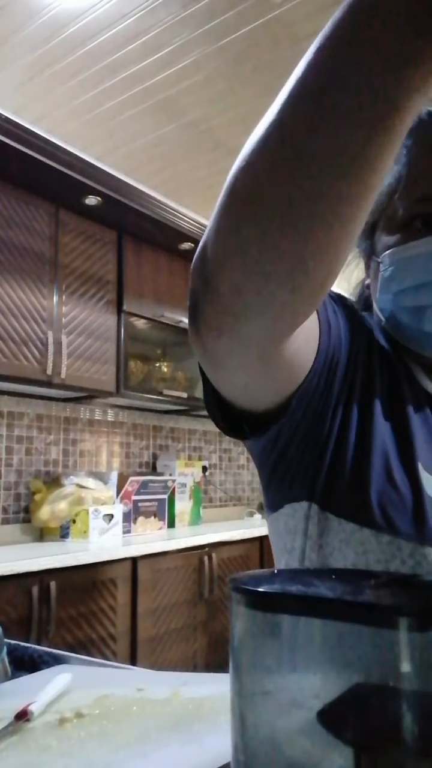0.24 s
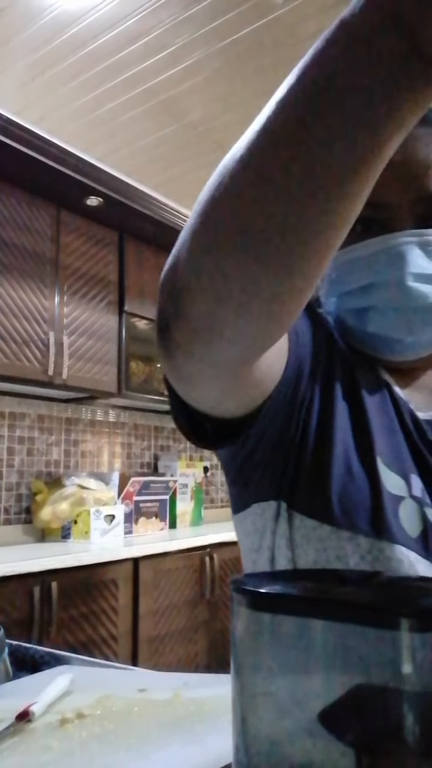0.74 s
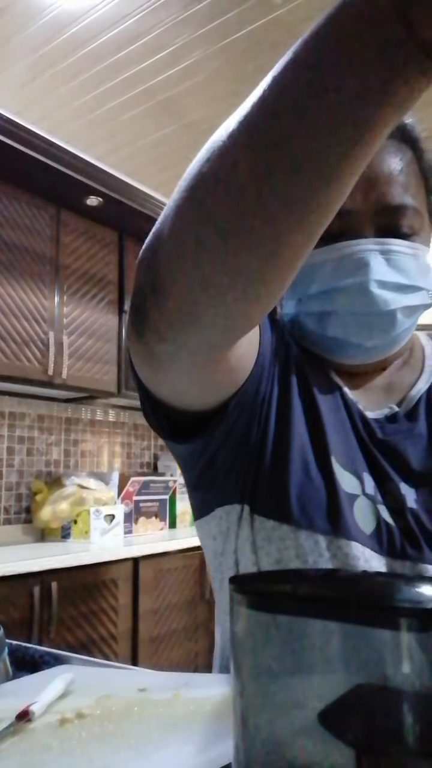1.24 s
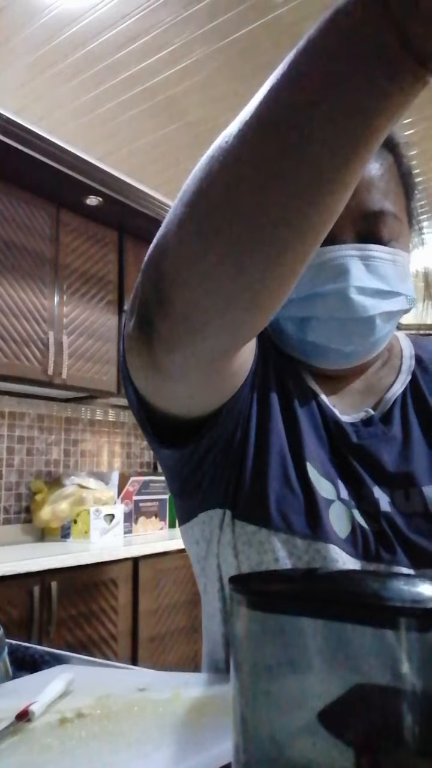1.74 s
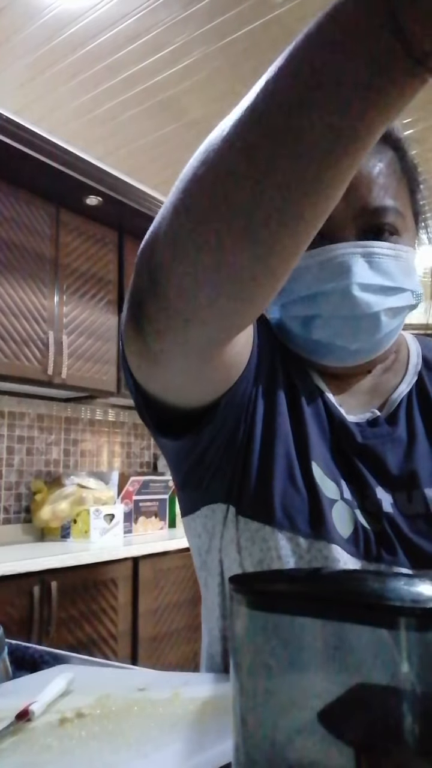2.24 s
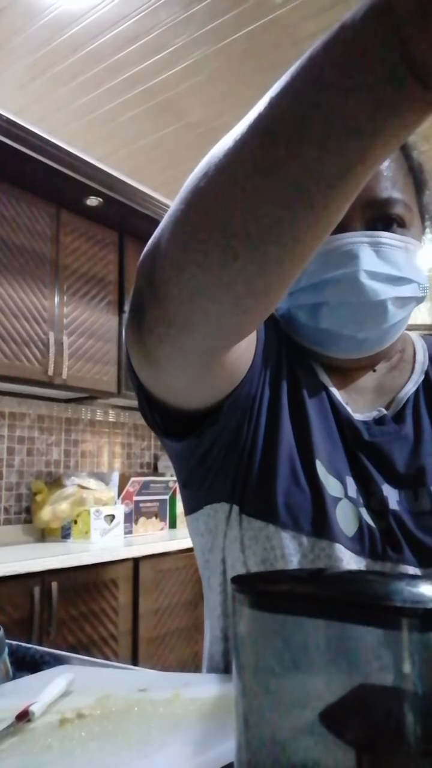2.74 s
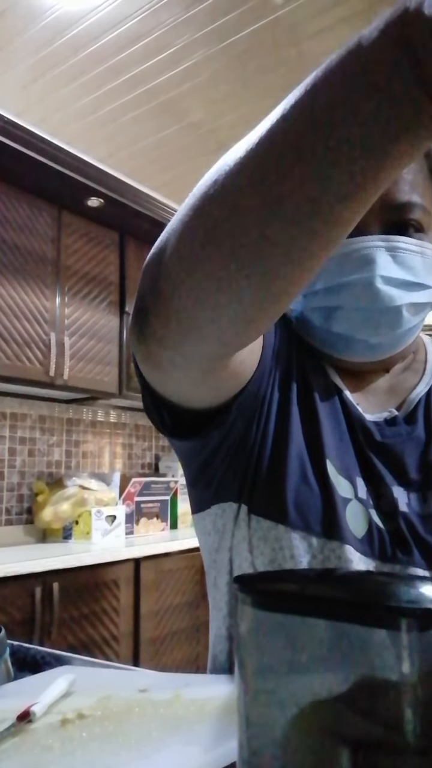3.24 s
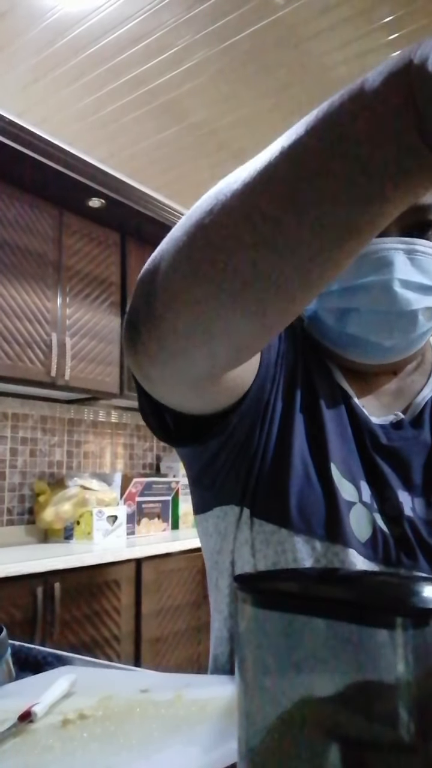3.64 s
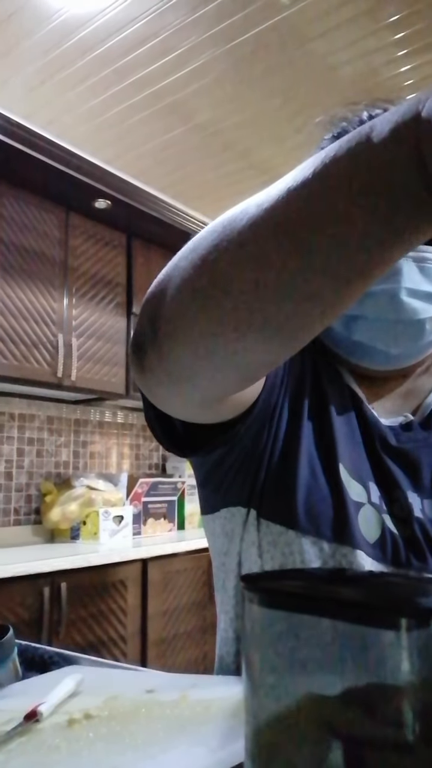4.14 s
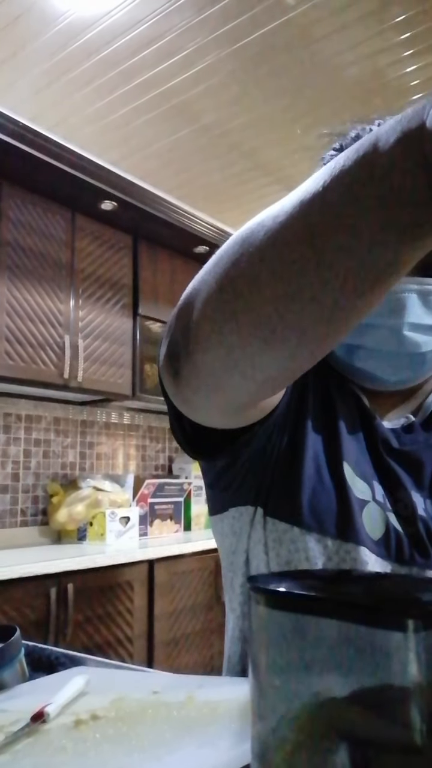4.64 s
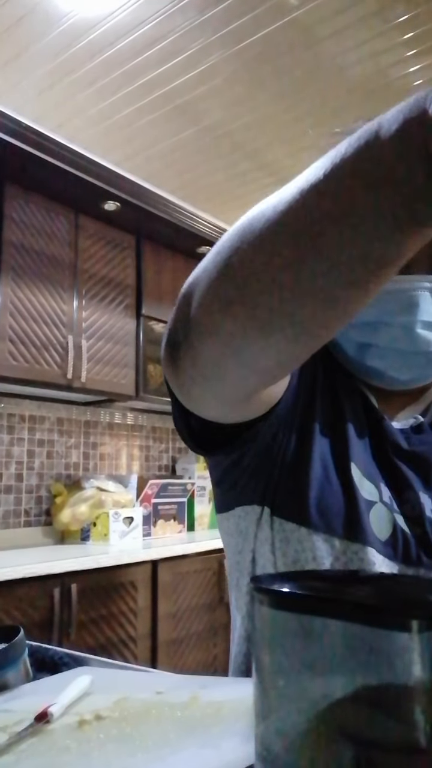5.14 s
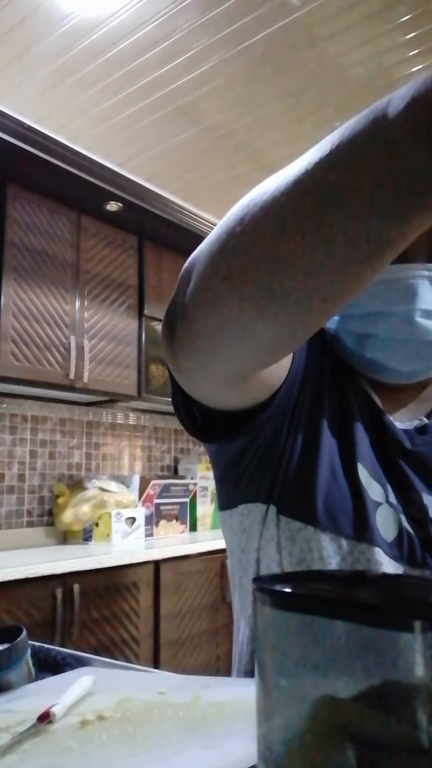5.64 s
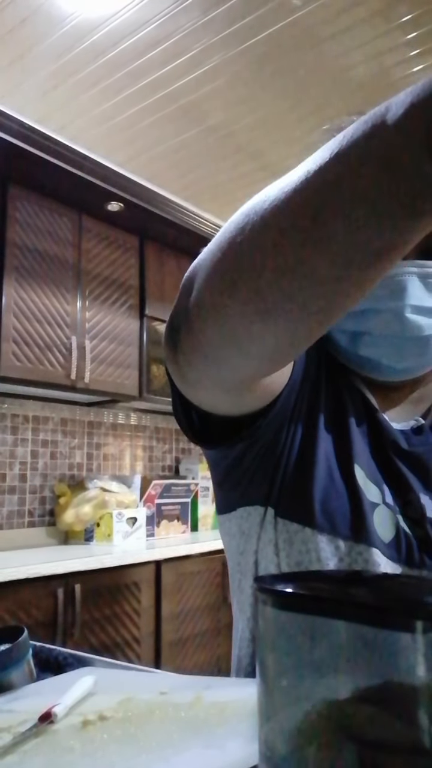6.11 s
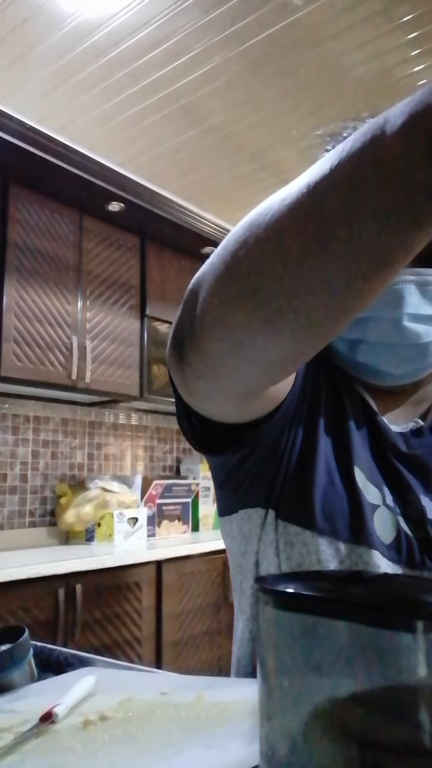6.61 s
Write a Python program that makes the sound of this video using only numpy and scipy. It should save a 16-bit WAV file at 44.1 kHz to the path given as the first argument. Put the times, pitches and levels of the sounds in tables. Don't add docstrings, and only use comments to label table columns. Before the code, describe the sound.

Plastic clicks and a hollow knock in a humming kitchen, then a juicer grinds fruit roughly, breaks free and whines steadily upward.

```python
import sys
import numpy as np
from scipy import signal
from scipy.fft import rfft, irfft, next_fast_len
from scipy.io import wavfile

SR = 44100
rng = np.random.default_rng(int(sys.argv[2]) if len(sys.argv) > 2 else 0)


def elevation(decibels):
    levels = np.asarray(decibels, float)
    return 10 ** (levels / 20)


def inscribe(sig):
    pcm = np.round(np.clip(np.atleast_2d(sig).T, -1, 1) * 32767)
    wavfile.write(sys.argv[1], SR, pcm.astype(np.int16))


N = 302967
TIME = np.arange(N) / SR
MAINS_PULSE_HZ = 120

# (frequency [Hz], level [dB])
ROOM_SPECTRUM = [(15, -63), (25, -20), (114, -10.5), (170, -5), (223, -21), (293, -9.5), (695, -13),
                 (775, -13.5), (1290, -20.5), (1940, -22), (4250, -33), (6740, -26), (8590, -39),
                 (14800, -50), (16000, -33)]
# (frequency [Hz], likeness [-1..1])
ROOM_ALIKE = [(60, 0.83), (130, 0.94), (290, 1), (640, 0.44), (1410, -0.54), (3100, 0.29), (6820, -0.22),
              (15000, 0.052)]
# (frequency [Hz], left over right [dB])
ROOM_SIDE = [(60, -7), (110, -2), (200, -2.0), (380, -2.5), (700, -4.5), (1290, -2), (2380, -9),
             (4400, -8.5), (8120, -5.5), (15000, -14)]
# (frequency [Hz], wander [Hz], level over room [dB])
HUM_LINES = [(122.7, 8.74, -10), (226.2, 0.58, -3), (404, 9.1, -18.5), (592, 7.4, -23), (766, 1.75, -14.5)]
# (time [s], depth [dB], recovery [dB/s])
GAIN_DIPS = [
    (1.95, -4, 10.5),
    (2.363, -28, 1500),
]
ROOM_DB, RUNNING_ROOM_DB, SWITCH_S, HUM_LOST_DB = -41, -49.5, 2.372, -3

# (time [s], peak [dB], resonance [Hz], t60 [s], pan [dB])
CLICKS = [(.1815, -36, 9000, 0.013, -15), (.3097, -25, 4600, 0.019, -15), (.3716, -32.5, 5760, 0.021, -18),
          (.9662, -34.5, 7840, 0.037, -11), (1.9131, -33.5, 12000, 0.058, -18),
          (1.927, -26, 9100, .04, -13), (1.9305, -34, 9450, 0.053, -21), (1.94, -16.5, 6550, 0.046, -20.5),
          (2.199, -48, 12070, 0.018, -5), (2.356, -31, 7000, 0.02, -6), (2.375, -23, 6500, 0.047, -13)]
# (frequency [Hz], level [dB])
SNAP_SPECTRUM = [(710, -66), (1200, -57), (1430, -16), (2980, 0.5), (3700, -22), (6370, 4), (8820, -4.5),
                 (14800, -7), (16000, 2.5)]
# (time [s], hold [s], force [dB])
KNOCKS = [
    (.3105, .001, -16),
    (.314, .012, -24),
    (.335, .012, -32),
    (.349, .037, -30.5),
]
# (frequency [Hz], level [dB], t60 [s])
TUB_MODES = [(70, -15.5, 0.047), (197, -7, 0.08), (340, -18, 0.059), (493, -3.5, 0.054), (604, -7, 0.084),
             (923, -7, 0.017), (1012, -11, 0.021), (1430, -31, 0.037), (2400, -39, 0.069)]
LAND_DB_PER_S, LIFT_DB_PER_S = 9000, 2000

# (frequency [Hz], likeness [-1..1])
JUICER_ALIKE = [(60, 0.89), (300, 0.84), (700, 0.57), (2000, 0.046), (6000, 0.035), (15000, 0.03)]
LAG_SAMPLES = 22
IN_STEP_HZ = 462
# (time [s], hold [s], housing thump [dB], pulp rumble [dB], tearing hiss [dB])
PUSHES = [(2.428, 0.022, -38.5, -41.5, -53), (2.498, .13, -35, -25.5, -38.5),
          (2.678, 0.13, -29, -26, -30.5), (2.971, 0.13, -32, -32, -29.5), (3.157, 0.027, -29, -28.5, -29.5),
          (3.342, 0.15, -41.5, -37, -31.5), (3.481, 0.11, -35, -32, -30), (3.64, 0.14, -38.5, -35.5, -32),
          (3.833, 0.065, -33, -28.5, -30), (3.939, 0.021, -23, -28.5, -32.5),
          (4.058, 0.0052, -29, -29.5, -35.5)]
# (thump [dB], rumble [dB], hiss [dB])
BETWEEN_DB = (-44.5, -39, -33)
GRATING_START_S, GRATING_END_S = 2.56, 3.4
# (thump [dB/s], rumble [dB/s], hiss [dB/s])
PRESS_DB_PER_S = (322, 250, 201)
EASE_DB_PER_S = (279, 200, 134)
# (frequency [Hz], level [dB])
THUMP_SPECTRUM = [(15, -47), (25, -37), (70, 5), (140, -2.5), (173, -0.5), (249, -13.5), (300, -7),
                  (390, -14), (660, -120)]
# (frequency [Hz], level [dB])
STALLED_SPECTRUM = [(130, -37), (220, -8.5), (252, -25), (345, 0.5), (415, -3.5), (483, -8.5), (645, -6),
                    (783, -17.5), (941, -9), (1500, -23.5), (1950, -45), (3300, -120)]
# (frequency [Hz], level [dB])
RUMBLE_SPECTRUM = [(130, -40), (220, -5), (248, -19), (405, -0.5), (483, -11), (545, -4), (770, -10.5),
                   (912, -3.5), (1110, -12.5), (1500, -52), (1950, -51), (3300, -120)]
# (frequency [Hz], level [dB])
TEAR_SPECTRUM = [(710, -15), (1200, -3.5), (1280, -7), (1950, -2), (3050, -3), (3830, -8.5), (4800, -6.5),
                 (5240, 0.5), (5900, -4.5), (7100, 3), (7910, -8), (9210, -14), (13900, -16.5),
                 (15000, -14), (16000, -35)]
# (frequency [Hz], left over right [dB])
GRIND_SIDE = [(60, 0), (110, 5), (200, -2), (380, 1.5), (700, 2.5), (1290, 8.5), (2380, 0.5), (4400, 2.5),
              (8120, 3), (15000, -6.5)]
# (time [s], length [s], starting shaft speed [Hz], whine [dB])
SLIPS = [(2.923, 0.054, 71.1, -40), (3.077, 0.068, 76.6, -38.5), (3.244, 0.073, 75.6, -38),
         (3.338, 0.042, 73.96, -37.5), (3.446, 0.062, 79.6, -40), (3.601, 0.124, 71.94, -33.5),
         (3.771, 0.046, 79.9, -37), (3.843, .04, 77.9, -39.5)]
GAIN_HZ_PER_S, CATCH_DB_PER_S, LABOUR_DB = 38, 550, -50
# (time [s], peak [dB], resonance [Hz], pan [dB])
CRACKS = [(2.443, -34, 7180, -1), (2.5254, -21.5, 3040, 0), (2.574, -24, 2060, 0),
          (2.6017, -18.5, 3120, -5), (2.687, -24, 5200, 0), (2.72, -19.5, 5730, 6), (2.787, -23.5, 7080, 4),
          (2.847, -23, 7000, 5), (2.863, -19, 7250, 4), (3.1024, -22, 7260, 7), (3.15, -20, 7200, 9),
          (3.195, -21, 7350, -7), (3.232, -33, 2400, -3), (3.253, -37, 7110, -16), (3.5229, -19.5, 7340, 8),
          (3.548, -26, 2200, 0), (3.7857, -22, 3006, 13), (3.9008, -24, 7160, 1), (3.9328, -18, 6860, -5),
          (3.936, -20, 1800, -2), (4.0578, -25, 7120, 0), (4.075, -18.5, 5630, -9), (4.1515, -28, 2480, -8)]
FIBRE_T60_S = 0.048

FREE_S, TOP_HZ, QUICK_HZ, QUICK_S, SLOW_HZ, SLOW_S = 4.08, 220.94, 51.76, .3225, 89.3, .913
# (frequency [Hz], level [dB])
WHOOSH_SPECTRUM = [(24, -65), (40, -39), (65, -88), (107, -3), (155, -14.5), (208, -5), (265, -9.5),
                   (410, -0.5), (644, -12), (709, -39), (1170, -20.5), (1290, -46), (1900, -45),
                   (2470, -56), (4180, -120)]
# (frequency [Hz], level [dB])
HISS_SPECTRUM = [(880, -35), (1500, -7), (1870, -10.5), (2410, -4.5), (3000, -8.5), (3660, -11.5),
                 (3960, -7.5), (4290, -10.5), (4780, -6), (6430, 4), (7610, -0.5), (8660, -14.5),
                 (9750, -9), (10800, -13), (14900, -14), (16000, -22)]
# (frequency [Hz], level [dB])
CHUTE_SPECTRUM = [(700, -50), (850, 0.5), (1000, 7.5), (1200, 9), (1300, -51)]
# (frequency [Hz], left over right [dB])
AIR_SIDE = [(60, 15), (110, -5), (200, 5), (380, -7.5), (700, 0.5), (1290, 5), (2380, -10.5), (4400, 1.5),
            (8120, -2), (15000, -16.5)]
# (whoosh [dB], hiss [dB], chute [dB])
AIR_DB = (-44, -46.5, -56.5)
AIR_POWER = (2.8, 1.13, -0.43)
# (basket [dB], chute [dB])
CLEARING_S = (4.08, 4.15)
CLEARING_DB = (-39, -46)
CLEARING_DB_PER_S = 180
COUNTER_HZ, COUNTER_WIDTH_HZ, SHUDDER_DB = 197.3, 5.1, -55

WOBBLE_DB, FEET_HZ, FEET_WIDTH_HZ, FEET_DB, WOBBLE_RISE_S = -41.5, 118, 8, 7.5, .1
# (frequency [Hz], left [dB], right [dB])
WHINE_PATH = [(1050, -45, -49), (1275, -45, -47), (1425, -59, -47), (1540, -59, -48), (1650, -49, -40),
              (1725, -48, -42), (1800, -53, -48), (1875, -43, -40), (1950, -42, -40), (2040, -33, -39),
              (2075, -34, -38), (2110, -40, -43), (2150, -41, -46), (2210, -43, -39), (2245, -54, -38),
              (2315, -46, -32), (2350, -47, -32), (2420, -40, -30), (2455, -43, -32), (2525, -43, -33),
              (2560, -54, -32), (2610, -49, -33), (2640, -42, -34), (2700, -38, -39), (2780, -38, -42)]
# (shaft order, mains sideband, level re whine [dB])
WHINE_PARTNERS = [(12, 0, 0), (12, -1, -7), (12, 1, -6), (12, -2, -33), (12, 2, -22)]
SIDEBAND_TURN_RAD = .9
# (shaft order, mains sideband, left [dB], right [dB],
# loss below top speed [dB per shaft Hz], left lead [rad])
SLOTS = [(9, 0, -62, -63, .8, 0), (9, 1, -56, -58, 1.0, 0), (10, -1, -54, -56, 1.0, 0),
         (10, 0, -49, -51, .3, 1.9), (10, 1, -63, -56, .3, 0), (11, -1, -61, -57, .2, 0),
         (11, 0, -59, -45, .3, .3), (11, 1, -53, -46, .15, -1.8), (13, -1, -50, -48.5, .1, -2.6),
         (13, 0, -56, -54, -.2, 2.4), (13, 1, -56, -58, .3, 0), (14, -1, -60, -61, .2, 0),
         (14, 0, -51, -52, .6, 0), (15, 0, -63, -60, .3, 0)]
# (shaft order, level [dB], left lag [samples], loss below 150 Hz [dB per shaft Hz])
OVERTONES = [(24, -1, 23, 0), (36, -3.5, 20, .4), (48, -11, 22, 0), (60, -15.5, 22, 0), (72, -17, 22, 0),
             (84, -19, 22, 0)]
# (frequency [Hz], width [Hz], left [dB], right [dB])
SHELL_MODES = [(2500, 330, -52, -36), (2990, 160, -31, -40), (3660, 200, -51, -51), (4050, 200, -49, -54),
               (4700, 300, -52, -50), (5150, 230, -35, -44), (5400, 120, -43, -46), (6296, 150, -33, -25),
               (6754, 200, -32, -26), (7050, 280, -31, -42), (7740, 250, -47, -53), (8250, 300, -40, -35),
               (9000, 400, -43, -44), (9900, 700, -42, -40), (11800, 500, -47, -29), (12800, 700, -48, -37),
               (13600, 400, -46, -32), (14900, 400, -54, -30)]
# (shaft order, left [dB], right [dB])
FAINT_ORDERS = [(2, -50, -48), (3, -49, -49), (5, -29, -34)]
# (time [s], peak [dB], resonance [Hz], t60 [s], pan [dB])
FLUNG_SCRAPS = [(4.245, -30, 4200, .02, 0), (4.7664, -28, 3200, .016, -4), (4.7668, -24, 5200, .016, 0),
                (4.8484, -17, 7000, .014, 0), (4.8488, -23, 4900, .014, 0), (4.9686, -28, 6630, .014, -3)]


def rms_one(x):
    return x / np.sqrt(np.mean(x ** 2) + 1e-20)


def at_hz(points, hz, axis=1):
    points = np.array(points)
    return np.interp(np.log(hz), np.log(points[:, 0]), points[:, axis])


def drift(rate, part=slice(None)):
    r = np.exp(-80 * np.pi * rate / SR)
    noise = rng.standard_normal(N // 40 + 2002)
    slow = rms_one(signal.lfilter([1], [1, -2 * r, r * r], noise)[2000:])
    return np.interp(TIME[part] * (SR / 40), np.arange(len(slow)), slow)


def pressing(rows, rise_db_per_s, fall_db_per_s):
    levels_db = []
    for s, hold_s, db in rows:
        rise_db = rise_db_per_s * np.maximum(s - TIME, 0)
        fall_db = fall_db_per_s * np.maximum(TIME - s - hold_s, 0)
        levels_db.append(db - rise_db - fall_db)
    return np.max(levels_db, axis=0)


def coloured(pair, span, spectrum, alike, side_db, patchy_db, lag=0):
    part = slice(round(span[0] * SR), min(round(span[1] * SR), N))
    length = part.stop - part.start
    size = next_fast_len(length)
    hz = np.maximum(np.arange(size // 2 + 1) * SR / size, 1)
    mid, side = rfft(pair[:, part], size) * elevation(at_hz(spectrum, hz))
    likeness = np.clip(at_hz(alike, hz), -1, 1)
    mid, side = np.sqrt(1 + likeness) * mid, np.sqrt(1 - likeness) * side
    tilt = elevation(at_hz(side_db, hz) / 2)
    late = np.exp(-2j * np.pi * np.maximum(hz - IN_STEP_HZ, 0) * lag / SR)
    both = np.array([(mid + side) * tilt * late, (mid - side) / tilt])
    out, half_octave = np.zeros((2, N)), 2 * np.log2(hz)
    first, last = int(2 * np.log2(spectrum[0][0])), int(2 * np.log2(spectrum[-1][0])) + 1
    for k in range(first, last + 1):
        band = irfft(both * np.clip(1 - abs(half_octave - k), 0, 1), size)[:, :length]
        out[:, part] += band * elevation(patchy_db * drift(9.2, part))
    return out / np.sqrt(np.mean(out[:, part].mean(axis=0) ** 2))


def juicer_noise(pair, span, spectrum, side_db, patchy_db):
    return coloured(pair, span, spectrum, JUICER_ALIKE, side_db, patchy_db, LAG_SAMPLES)


def ring(x, hz, t60):
    r, w = elevation(-60 / (t60 * SR)), 2 * np.pi * hz / SR
    return signal.lfilter([0, np.sin(w)], [1, -2 * r * np.cos(w), r * r], x + 1e-18)


def tone(phase, left_db, right_db, lag=LAG_SAMPLES, lead=0):
    left = np.roll(np.sin(phase + lead), lag) * elevation(left_db)
    return np.sqrt(2) * np.array([left, np.sin(phase) * elevation(right_db)])


def snaps(rows, body, ring_db):
    size = 4096
    out, age = np.zeros((2, N)), np.arange(size) / SR
    colour = elevation(at_hz(body, np.maximum(np.arange(size // 2 + 1) * SR / size, 1)))
    for s, peak_db, hz, t60, pan_db in rows:
        burst = rng.standard_normal((2, size))
        burst = irfft(rfft(burst + burst[0]) * colour)
        burst = rms_one(burst) + elevation(ring_db) * rms_one(ring(burst, hz, 0.0035))
        attack = 1 + 1.4 * np.exp(-age / 0.0016)
        level_db = peak_db - 16 - 60 * age / t60 + np.array([[pan_db / 2], [-pan_db / 2]])
        start = round(s * SR)
        out[:, start:start + size] += burst * attack * elevation(level_db)
    return out


def kitchen():
    noise = rng.standard_normal((2, N))
    room = elevation(-6.0) * coloured(noise, (0, 7), ROOM_SPECTRUM, ROOM_ALIKE, ROOM_SIDE, patchy_db=1.4)
    for hz, wander_hz, line_db in HUM_LINES:
        phase = 2 * np.pi * np.cumsum(hz + wander_hz * drift(18.6)) / SR
        line_db = line_db + HUM_LOST_DB * (TIME > SWITCH_S) + 2.67 * drift(9.8)
        side_db = at_hz(ROOM_SIDE, hz) / 2
        room += tone(phase, line_db + side_db, line_db - side_db, lag=0)
    sunk = 1 - np.exp(-np.maximum(TIME - SWITCH_S, 0) / 0.035)
    level_db = ROOM_DB + (RUNNING_ROOM_DB - ROOM_DB) * sunk
    for s, depth_db, recover_db_per_s in GAIN_DIPS:
        level_db += np.minimum(depth_db + recover_db_per_s * (TIME - s), 0) * (TIME > s)
    return room * elevation(level_db)


def clicks():
    return elevation(1.5) * snaps(CLICKS, SNAP_SPECTRUM, ring_db=-5)


def knocks():
    force = rng.standard_normal(N) * elevation(pressing(KNOCKS, LAND_DB_PER_S, LIFT_DB_PER_S) - 19.0)
    out = np.zeros(N)
    for k, (hz, level_db, t60) in enumerate(TUB_MODES):
        out += (-1) ** k * elevation(level_db) * ring(force, hz, t60)
    touch = np.zeros(N)
    touch[round((KNOCKS[0][0] - .001) * SR)] = elevation(-18.5)
    out += ring(touch, 1026, 0.044) - ring(touch, 920, 0.039) + elevation(-11.5) * ring(touch, 1500, 0.033)
    touch = np.roll(touch, round(.0625 * SR))
    out += elevation(-26) * ring(touch, 1510, .04) + elevation(-14) * ring(touch, 960, .04)
    return out * elevation(np.array([[-1.5], [1.5]]))


def grains(per_s, spread_db):
    sizes = elevation(spread_db * np.minimum(rng.exponential(1, (2, N)), 4)) * rng.choice([-1, 1], (2, N))
    return rms_one(sizes * (rng.random((2, N)) < per_s / SR))


def grated_fruit(turn):
    bite = elevation(0.51 * np.cos(turn) + 1.66 * drift(59))
    levels_db = []
    for k in range(3):
        rows = [(GRATING_START_S, GRATING_END_S - GRATING_START_S, BETWEEN_DB[k])]
        rows += [(row[0], row[1], row[2 + k]) for row in PUSHES]
        levels_db.append(pressing(rows, PRESS_DB_PER_S[k], EASE_DB_PER_S[k]))
    thump_db, rumble_db, hiss_db = levels_db
    thump = juicer_noise(grains(900, 0.58) * bite, (2.3, 4.3), THUMP_SPECTRUM, GRIND_SIDE, patchy_db=-3.0)
    pulp = grains(2000, 1.8) * bite
    stalled = juicer_noise(pulp, (2.3, 3.0), STALLED_SPECTRUM, GRIND_SIDE, patchy_db=1.5)
    rumble = juicer_noise(pulp, (2.8, 4.3), RUMBLE_SPECTRUM, GRIND_SIDE, patchy_db=3.0)
    turning = np.clip((TIME - 2.85) / .1, 0, 1)
    rumble = np.sqrt(1 - turning) * stalled + np.sqrt(turning) * rumble
    tearing = rng.standard_normal((2, N)) * bite + .5 * grains(1500, 3.4)
    hiss = juicer_noise(tearing, (2.3, 4.3), TEAR_SPECTRUM, GRIND_SIDE, patchy_db=1.5)
    return thump * elevation(thump_db) + rumble * elevation(rumble_db - 2.5) + hiss * elevation(hiss_db - 1.46)


def labouring_whine(turn):
    rows = [(s, length_s, db) for s, length_s, _, db in SLIPS] + [(SLIPS[0][0], 1, LABOUR_DB)]
    level_db = pressing(rows, CATCH_DB_PER_S, CATCH_DB_PER_S) + 4 * drift(35)
    whine = tone(12 * turn, level_db + 9, level_db - 8)
    whine += tone(24 * turn, level_db - 9, level_db - 14)
    whine += tone(36 * turn, level_db - 10, level_db - 15)
    return whine * (1 + 0.2 * np.cos(2 * np.pi * MAINS_PULSE_HZ * TIME))


def grinding():
    start, length, start_hz, _ = np.transpose(SLIPS)
    now = np.maximum(np.searchsorted(start - .015, TIME) - 1, 0)
    shaft = start_hz[now] + GAIN_HZ_PER_S * np.clip(TIME - start[now], 0, length[now])
    turn = 2 * np.pi * np.cumsum(shaft * (1 + .02 * drift(40))) / SR
    return grated_fruit(turn) + labouring_whine(turn)


def fibre_cracks():
    rows = [(s, db, hz, FIBRE_T60_S, pan_db) for s, db, hz, pan_db in CRACKS]
    return snaps(rows, TEAR_SPECTRUM, ring_db=2)


def free_speed():
    age = np.maximum(TIME - FREE_S, 0)
    return TOP_HZ - QUICK_HZ * np.exp(-age / QUICK_S) - SLOW_HZ * np.exp(-age / SLOW_S)


def air():
    shaft = free_speed()
    speed_db, before_db = 20 * np.log10(shaft / TOP_HZ), 400 * np.maximum(FREE_S - TIME, 0)
    whoosh_db, hiss_db, chute_db = (db + power * speed_db - before_db for db, power in zip(AIR_DB, AIR_POWER))
    basket_db, clearing_db = (pressing([(s, 0, db)], 400, CLEARING_DB_PER_S)
                              for s, db in zip(CLEARING_S, CLEARING_DB))
    whoosh_db, chute_db = np.maximum(whoosh_db, basket_db), np.maximum(chute_db, clearing_db)
    chopping = 1 + 0.017 * np.cos(2 * np.pi * MAINS_PULSE_HZ * TIME)
    low_noise, high_noise = rng.standard_normal((2, 2, N)) * chopping
    whoosh = juicer_noise(low_noise, (4, 7), WHOOSH_SPECTRUM, AIR_SIDE, patchy_db=1.0)
    hiss = juicer_noise(high_noise, (4, 7), HISS_SPECTRUM, AIR_SIDE, patchy_db=1.6)
    chute = juicer_noise(high_noise, (4, 7), CHUTE_SPECTRUM, AIR_SIDE, patchy_db=1.0)
    shudder_db = SHUDDER_DB - 4.5 * ((shaft - COUNTER_HZ) / COUNTER_WIDTH_HZ) ** 2
    shudder = rms_one(ring(ring(low_noise[0], 92, 0.1), 93, 0.11)) * elevation(shudder_db)
    return chute * elevation(chute_db) + whoosh * elevation(whoosh_db + 2.5) + hiss * elevation(hiss_db + 7.5) + shudder


def basket_wobble(shaft, turn, age, free):
    feet_db = FEET_DB / (1 + ((shaft - FEET_HZ) / FEET_WIDTH_HZ) ** 2)
    level_db = WOBBLE_DB + feet_db - 20 * np.exp(-3 * age / WOBBLE_RISE_S) + 1.0 * drift(18.0, free)
    return tone(turn, level_db - 4.5, level_db + 0.5, lag=0)


def commutator_whine(shaft, turn, pulse, wander, free):
    sound = 0
    for order, band, under_db in WHINE_PARTNERS:
        hz = order * shaft + band * MAINS_PULSE_HZ
        level_db = under_db + 0.26 * drift(7.1, free)
        phase = order * turn + band * pulse + wander + SIDEBAND_TURN_RAD * abs(band)
        sound += tone(phase, at_hz(WHINE_PATH, hz) + level_db, at_hz(WHINE_PATH, hz, axis=2) + level_db)
    return sound


def slot_tones(shaft, turn, pulse, wander, free):
    sound = 0
    for order, band, left_db, right_db, lost_db, lead in SLOTS:
        sag_db = -lost_db * (shaft[-1] - shaft) - (lost_db < 0) * np.maximum(185 - shaft, 0)
        phase = order * turn + band * pulse + wander + order * order
        left_db = left_db + sag_db + 1.2 * drift(3, free)
        right_db = right_db + sag_db + 1.2 * drift(3, free)
        sound += tone(phase, left_db, right_db, lag=0, lead=lead)
    return sound


def commutator_overtones(shaft, turn, free):
    grid_hz = np.arange(1500, 19000, 10)
    power = 0
    for hz, width_hz, left_db, right_db in SHELL_MODES:
        peak = elevation([[2 * left_db], [2 * right_db]])
        power = power + peak / (1 + (2 * (grid_hz - hz) / width_hz) ** 2) ** 1.25
    shell_db = 10 * np.log10(power)
    sound = 0
    for order, level_db, lag, lost_db in OVERTONES:
        level_db = level_db - lost_db * np.maximum(150 - shaft, 0)
        left_db, right_db = (np.interp(order * shaft, grid_hz, side) + level_db + 1.3 * drift(5, free)
                             for side in shell_db)
        sound += tone(order * turn + order / 300 * drift(60, free), left_db, right_db, lag)
    return sound


def faint_orders(shaft, turn, free):
    sound = 0
    for order, left_db, right_db in FAINT_ORDERS:
        housing_db = at_hz(WHOOSH_SPECTRUM, order * shaft) - .2 * (shaft[-1] - shaft)
        left_db = left_db + housing_db + 2.5 * drift(6, free)
        right_db = right_db + housing_db + 2.5 * drift(6, free)
        sound += tone(order * turn + 0.25 * drift(47, free), left_db, right_db)
    return sound


def free_motor():
    free = slice(round(FREE_S * SR), N)
    shaft, age = free_speed()[free], TIME[free] - FREE_S
    turn, pulse = 2 * np.pi * np.cumsum(shaft) / SR, 2 * np.pi * MAINS_PULSE_HZ * TIME[free]
    wander = .05 * drift(40, free)
    throb = 1 + .3 * np.cos(pulse)
    sound = basket_wobble(shaft, turn, age, free)
    sound += commutator_whine(shaft, turn, pulse, wander, free)
    sound += slot_tones(shaft, turn, pulse, wander, free)
    sound += throb * (commutator_overtones(shaft, turn, free) + faint_orders(shaft, turn, free))
    out = np.zeros((2, N))
    out[:, free] = sound * np.clip(age / 0.069, 0, 1)
    return out


def flung_scraps():
    return elevation(1.5) * snaps(FLUNG_SCRAPS, SNAP_SPECTRUM, ring_db=0.5)


def scene():
    handling = clicks() + knocks()
    loaded = grinding() + fibre_cracks()
    running_free = air() + free_motor() + flung_scraps()
    return kitchen() + handling + loaded + running_free


def top_cut(x):
    return signal.sosfilt(signal.butter(12, 16580, fs=SR, output="sos"), x)


def record(dry):
    rounded = .45 * np.tanh(dry / .45)
    low_pass = signal.cheby2(20, 55, 15880, fs=SR, output="sos")
    mix = signal.sosfilt(low_pass, rounded)
    return top_cut(mix)


dry = scene()
out = record(dry)
inscribe(out)
```